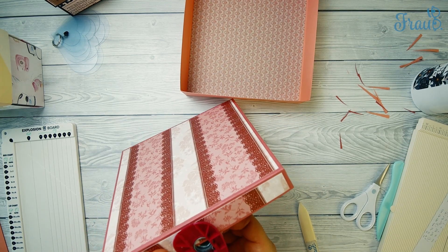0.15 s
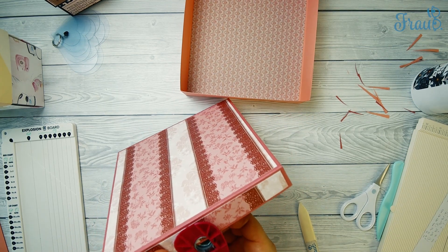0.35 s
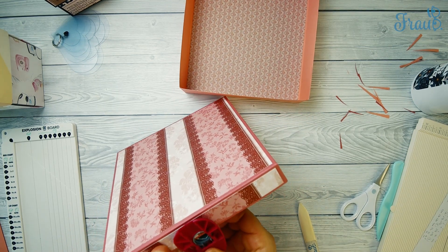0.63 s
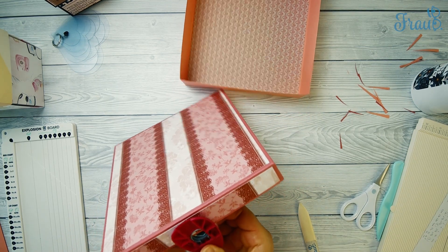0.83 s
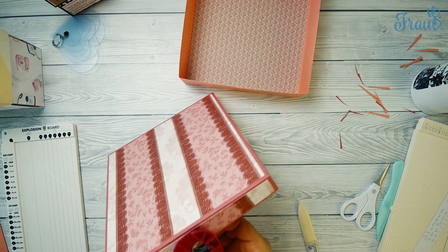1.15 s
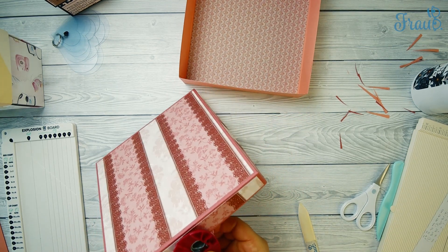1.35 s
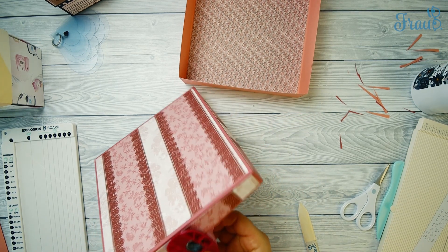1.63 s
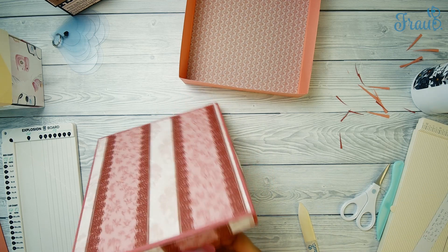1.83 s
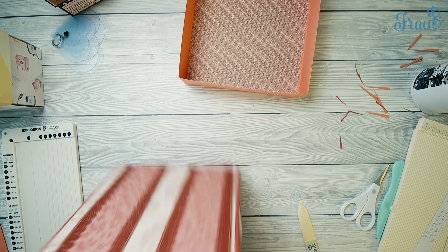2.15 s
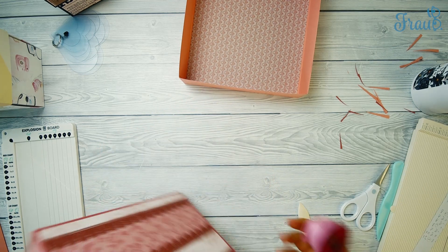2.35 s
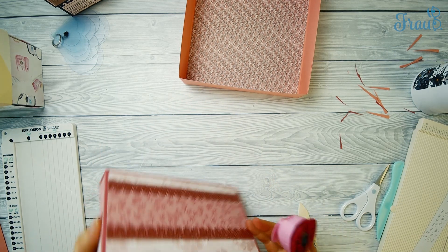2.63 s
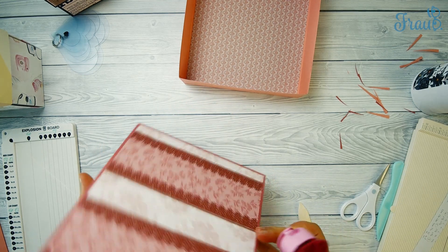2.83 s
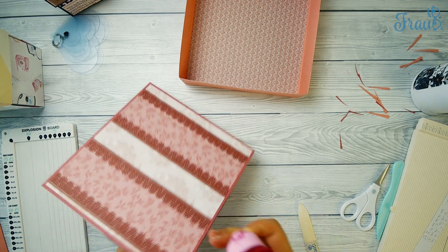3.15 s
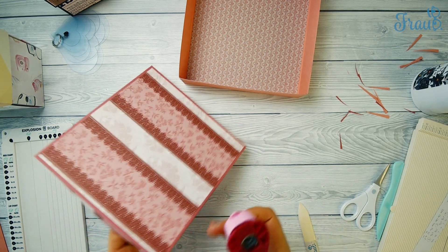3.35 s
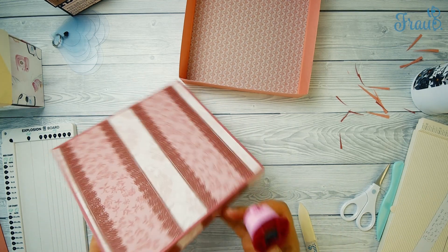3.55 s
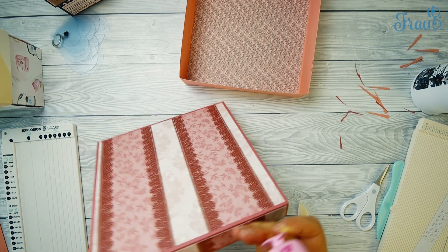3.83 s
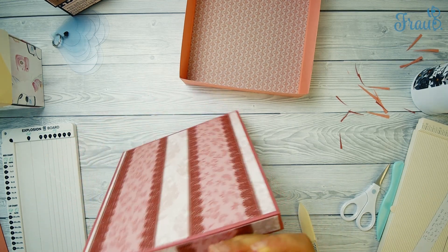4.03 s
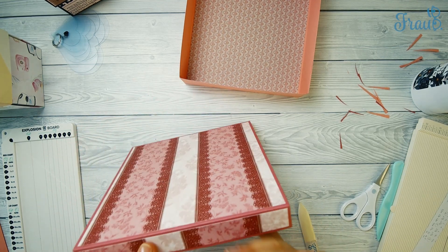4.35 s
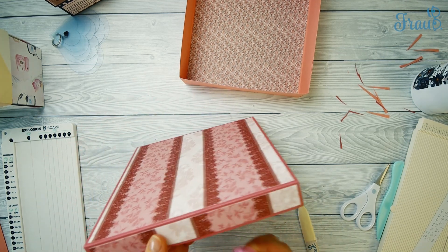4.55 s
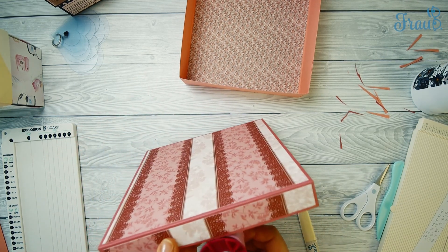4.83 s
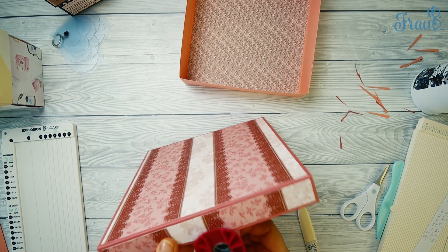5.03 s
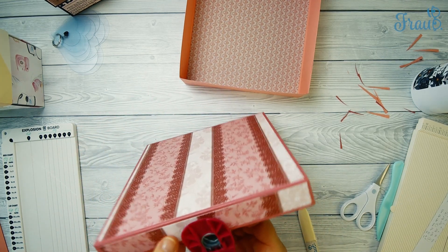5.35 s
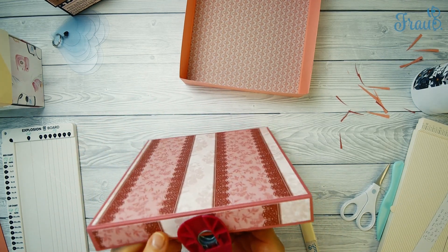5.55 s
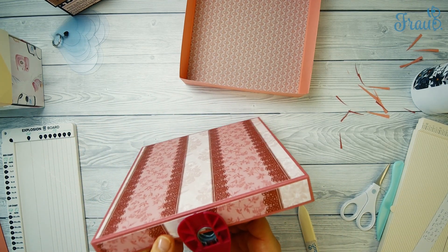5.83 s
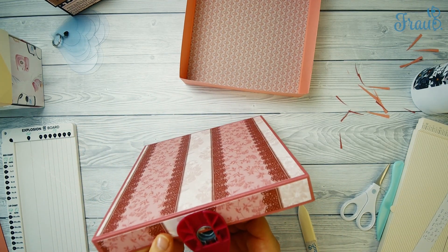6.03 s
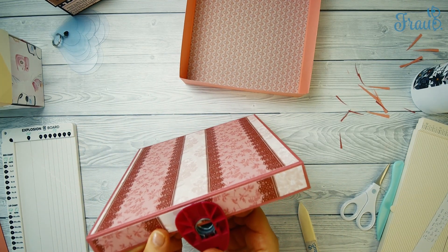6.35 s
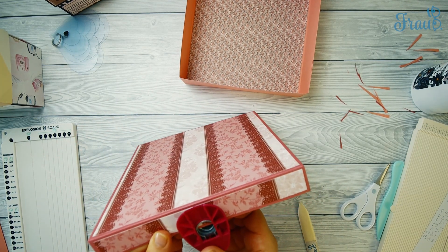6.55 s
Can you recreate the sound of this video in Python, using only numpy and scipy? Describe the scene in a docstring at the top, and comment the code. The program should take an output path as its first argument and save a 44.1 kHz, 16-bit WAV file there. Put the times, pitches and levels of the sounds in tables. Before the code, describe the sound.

Small dry lever ticks and hand rustle, one hard overloaded punch snap through cardstock, then papery sliding and hollow box-lid knocks, fading to a faint squeak.

```python
"""Small dry ticks and the brush of hands come first, in a quiet room: a hand punch is being loaded.
Then it snaps through the cardstock rim of a paper-covered box lid; hands slide, turn and knock the lid.
Noise bursts ring the modes of punch, lid and paper; streams of friction grains make the sliding.
The close microphone overloads on the snap, and its limiter lets the room's tail swell back.
Near the end a spring squeaks faintly, made of thin wavering lines."""
import sys
import numpy as np
from scipy import signal
from scipy.fft import rfft, irfft
from scipy.io import wavfile
from scipy.ndimage import map_coordinates

SR = 44100
rng = np.random.default_rng(int(sys.argv[2]) if len(sys.argv) > 2 else 0)


def gain_from_db(level_db):
    """Convert decibel levels to linear amplitude factors (20 dB per decade)."""
    decades = np.asarray(level_db, float) / 20
    return 10 ** decades


def int16_out(signal):
    """Quantize to a 16-bit WAV file."""
    q = np.round(np.clip(np.atleast_2d(signal).T, -1, 1) * 32767)
    wavfile.write(sys.argv[1], SR, q.astype(np.int16))


N = 294777   # length of the scene in samples

# All levels are those ahead of the microphone's limiter.
# ringing modes of the metal punch: f/Hz, relative level/dB, time to fall 60 dB/s
PUNCH_MODES = [(1500, -9, .01), (1900, -1, .012), (2200, 0, .016), (2450, -3, .012), (2930, -6, .012),
               (3650, -7, .011), (4150, -10, .007), (4600, -9, .007), (5300, -10, .004), (6300, -10, .004),
               (7400, -10, .003), (8600, -11, .003), (10500, -13, .002), (13000, -16, .002)]
# ringing modes of the hollow lid: f/Hz, relative level/dB, time to fall 60 dB/s
LID_MODES = [(166.4, 2.5, 0.038), (224.8, -2, 0.062), (287, -8, .07), (333.6, -2.5, 0.07),
             (400, 0.5, 0.051), (480, -1.5, 0.041), (562.7, 0.5, 0.046), (688, -1.5, 0.024),
             (752, -2, 0.057), (881.5, 1.5, 0.021), (1000, -0.5, 0.03), (1100, 2.5, 0.02), (1200, 3, 0.024),
             (1400, 0.5, 0.016), (1676, -2, 0.03), (1720, -1.5, 0.012), (1931, -3.5, 0.018),
             (2112, -7, 0.015)]
# ringing modes of the paper cover when it cracks: f/Hz, relative level/dB, time to fall 60 dB/s
PAPER_MODES = [(2600, 1.5, 0.0051), (3357, 0, 0.0048), (3800, -1, 0.0067), (5500, -4, 0.0033),
               (8000, -6.5, 0.0018), (12000, -18.5, 0.0026)]
# modes of the rim under sliding fingers: f/Hz, time to fall 60 dB/s
RIM_MODES = [(3050, 0.02), (3400, 0.0072)]
# lever ticks of the punch: t/s, peak level/dB, centre f/Hz
LEVER_TICKS = [(0.3172, -23, 2150), (0.3224, -24, 2320), (0.3541, -25, 1910), (0.3745, -27, 2050),
               (0.4015, -22, 2320), (0.5432, -28, 1910), (0.5591, -27, 1860), (0.5985, -26, 2240),
               (0.624, -25, 1890), (0.6409, -26, 1910), (0.6564, -27, 2220), (0.6744, -26, 1900),
               (0.6933, -25, 1920), (0.7063, -25, 1920), (1.0859, -33, 2150), (1.7878, -19, 2060),
               (2.3276, -36, 2170), (6.565, -41, 2360), (6.6184, -36, 1720), (6.6283, -19, 3520)]
# knocks on the lid: t/s, peak level/dB, centre f/Hz, fading time of the push/ms, paper crack peak level/dB
LID_KNOCKS = [(1.148, -27.5, 540, 7, -32.5), (1.554, -36, 453, 2.1, -32), (1.798, -33, 504, 2.5, -34),
              (1.892, -16, 584, 3.6, -31), (2.536, -33.5, 454, 2, -50.5), (2.646, -36, 400, 3.5, -54),
              (2.792, -37, 396, 2.33, -55), (2.851, -30, 1210, 8.1, -40), (2.87, -25, 854, 2.4, -33),
              (3.017, -24, 1160, 1.9, -40), (3.059, -14, 379, 2.1, -32), (3.221, -7, 420, 3, -24.5),
              (3.241, -18, 340, 1.7, -37), (3.351, -17.5, 596, 1.8, -26), (3.459, -19, 830, 1.4, -31),
              (3.507, -26, 895, 2.6, -45), (3.623, -25, 835, 2.4, -52), (3.64, -25.5, 885, 3.9, -37.5),
              (3.677, -30, 318, 1.7, -41), (3.706, -27, 380, 2.6, -53), (3.798, -26.5, 393, 4.5, -42),
              (4.082, -25.5, 450, 2, -35), (4.094, -21.5, 496, 2.4, -33), (4.249, -13, 1100, 1.56, -24),
              (4.261, -20, 1170, 4.8, -32.5), (4.474, -32, 344, 3.7, -33), (4.961, -33.5, 470, 1.7, -54),
              (5.152, -27.5, 358, 3, -40.5), (5.255, -29.5, 1170, 3, -40.5), (5.301, -29.5, 401, 4.2, -41),
              (5.429, -43, 1300, 1.8, -51), (5.619, -33.5, 1260, 2.5, -53), (5.72, -38.5, 1500, 1.7, -48),
              (5.779, -42, 1400, 2.0, -56), (5.843, -33, 500, 5.3, -49.5), (5.898, -37.5, 447, 2.35, -52.5),
              (6.439, -45.5, 370.6, 4, -61)]
# dry crackles of the paper cover: t/s, peak level/dB
PAPER_CRACKLES = [(1.9696, -32), (2.1429, -28.5), (2.633, -43), (2.6723, -41), (2.836, -44.5),
                  (3.1363, -34), (3.1731, -34.5), (3.3084, -43), (3.7664, -44.5), (4.0632, -47.5),
                  (4.3884, -40), (4.567, -44), (4.8194, -37), (5.5296, -50)]
# strokes of the hands: start t/s, length/s, then level/dB of hollow boom, panel rasp and paper hiss
HAND_STROKES = [(0.328, .15, -49.5, -47, -61), (0.561, 0.17, -49, -49.5, -52),
                (0.843, .1, -30.5, -38, -42.5), (1.028, .06, -34.5, -41, -49.5),
                (1.12, .05, -31, -42.5, -42), (1.31, .03, -39, -43, -48), (1.546, .07, -37, -43.5, -44.5),
                (1.659, .09, -46, -42, -50.5), (1.798, 0.076, -33, -35.5, -40),
                (1.974, 0.04, -29, -34.5, -38.5), (2.063, .05, -36.5, -42.5, -47),
                (2.161, .05, -38.5, -30, -36), (2.637, 0.067, -47, -46.5, -54), (2.794, .02, -52, -50, -60),
                (2.868, .11, -41.5, -37.5, -48), (3.014, 0.06, -29, -28.5, -45),
                (3.135, 0.017, -40, -36, -51), (3.233, 0.032, -44, -28.5, -45.5),
                (3.314, 0.072, -33, -32, -40), (3.453, 0.092, -38.5, -40.5, -47.5),
                (3.619, .12, -39.5, -42.5, -56.5), (3.769, 0.028, -36, -38.5, -49.5),
                (3.851, 0.076, -40, -42, -53.5), (4.053, 0.056, -40.5, -46.5, -54),
                (4.261, .06, -35, -47, -48.5), (4.382, 0.08, -34, -40, -47),
                (4.588, 0.042, -41, -48, -53.5), (4.687, 0.19, -46, -49, -55.5),
                (4.961, 0.112, -48.5, -49, -56.5), (5.139, 0.036, -45, -41, -54.5),
                (5.281, 0.17, -50, -47, -56), (5.532, .04, -45, -44, -55),
                (5.6, 0.042, -48.5, -41.5, -54.5), (5.7, 0.017, -52.5, -41.5, -61),
                (5.781, 0.018, -53.5, -51, -64), (5.869, .08, -54.5, -53, -63),
                (6.116, 0.056, -55, -62.5, -81), (6.3, 0.061, -54, -54.5, -68)]
# level of fingers that never quite rest: boom/dB, rasp/dB, hiss/dB
FIDGET_LEVELS = [-60.5, -63, -70.5]
# where the hands hold the lid, as the modes they favour: t/s, boom centre f/Hz, rasp centre f/Hz
HAND_GRIP = [(0.0, 300, 1570), (0.5, 464, 1710), (0.9, 530, 1370), (1.2, 530, 1200), (1.5, 480, 1800),
             (1.95, 495, 1040), (2.25, 502.3, 1200), (2.55, 367.1, 1220), (3.1, 414, 1070),
             (3.36, 520, 1070), (3.65, 350, 1000), (4.4, 480, 1136), (5.4, 420, 1300), (5.85, 496.5, 1235),
             (6.1, 333, 1150), (6.68, 359.6, 1300)]
# how much the rim sings under the fingers: t/s, level over the paper hiss/dB
RIM_SINGING = [(0.0, -24), (0.9, -11), (2.2, -11.5), (2.8, -12), (3.9, -16.5), (4.3, -8.5), (4.43, -2),
               (4.9, -10), (5.2, -12.5), (5.7, -10), (6.68, -15.5)]
# colour of the paper hiss: f/Hz, relative level/dB per Hz
PAPER_COLOUR = [(1470, -31), (2500, -8), (2640, -12), (2870, -14), (3330, -4), (3910, -6.5), (5250, -14),
                (5670, -14.5), (6770, -18), (9020, -22.5), (14300, -32.5), (15800, -31)]
# thin lines of the spring's squeak: f/Hz, level/dB
SQUEAK_LINES = [(1850, -62), (2380, -52), (4300, -58), (5950, -67)]
# colour of the snap sent round the room: f/Hz, relative level/dB per Hz
SNAP_ECHO_COLOUR = [(180, -52.5), (300, -23.5), (331, -12), (665, -12.5), (799, -20), (991, -8.5),
                    (1090, -17), (2130, -3.5), (2640, -12.5), (2870, -9), (3500, -14), (4130, -6.5),
                    (5390, -23.5), (11000, -22.5), (15800, -32)]
# how long the room's echoes last: f/Hz, time to fall 60 dB/s
ROOM_DECAY = [(250, 0.38), (1000, 0.44), (2500, 0.5), (6000, 0.42), (12000, .33)]
# low thumps through the table: t/s, level/dB
TABLE_THUMPS = [(1.15, -43), (1.34, -42), (1.8, -42), (1.9, -40), (2.16, -47), (2.659, -40), (2.92, -50),
                (3.07, -40.5), (3.24, -37.5), (3.48, -43.5), (3.86, -42.5), (4.26, -42.5), (5.17, -55),
                (5.529, -49.5)]
# low rumble under the thumps: t/s, level/dB
RUMBLE_LEVELS = [(0.0, -50.5), (0.11, -49), (0.8, -46), (1.2, -48), (1.7, -52), (3.7, -53.5), (4.4, -55.5),
                 (6.68, -54)]
# colour of the room tone: f/Hz, relative level/dB per Hz
ROOM_TONE_COLOUR = [(18, -48.5), (30, -23.5), (41, -14), (66, -16.5), (141, -26.5), (251, -16.5), (318, -7),
                    (424, -22.5), (1890, -31.5), (2100, -23), (2460, -49.5), (4050, -37), (13500, -36.5),
                    (15800, -43.5)]
# colour of what differs between the channels: f/Hz, relative level/dB per Hz
SIDE_COLOUR = [(18, -25.5), (30, 2), (318, -12.5), (717, -14.5), (1060, -19), (3200, -19), (5700, -16.5),
               (15800, -17)]

SNAP_START_S, SNAP_RISE_MS, SNAP_FALL_MS = 1.3385, 5.1, 0.83


def snap():
    """The blade tears through: noise swells for a few ms, then collapses, ringing punch and rim."""
    peak_db = 10.5
    ms = 1000 * (np.arange(N) / SR - SNAP_START_S)
    rise = np.clip(ms / SNAP_RISE_MS, 0, 1) ** 2
    fall = np.exp(-np.clip(ms - SNAP_RISE_MS, 0, 50) / SNAP_FALL_MS)
    force = rise * fall * (ms < 40) * rng.standard_normal(N)
    punch_gains = favour(PUNCH_MODES, np.array([2600]), db_per_octave=1.5)[0]
    punch = rms_one(high_pass(modes_of(force, PUNCH_MODES, punch_gains), 890))
    rim_gains = favour(LID_MODES, np.array([1500]), db_per_octave=12.0)[0]
    rim = rms_one(modes_of(force, LID_MODES, rim_gains))
    sound = punch + gain_from_db(-4) * rim
    return gain_from_db(peak_db) * sound / np.abs(sound).max()


def ticks():
    """The lever slips in tiny jerks, each a very short push that rings the punch."""
    s, peak_db, centre_hz = np.transpose(LEVER_TICKS)
    push_ms = 0 * s + 0.6
    strengths = favour(PUNCH_MODES, centre_hz, db_per_octave=0.8)
    return strike(zip(s, peak_db, push_ms), strengths, PUNCH_MODES)


def knocks():
    """A knock rings the lid and cracks the paper under it."""
    s, peak_db, centre_hz, push_ms, crack_db = np.transpose(LID_KNOCKS)
    crack_gains = favour(PAPER_MODES, 0 * s + 3500, db_per_octave=3.5)
    cracks = strike(zip(s, crack_db, push_ms), crack_gains, PAPER_MODES)
    lid_gains = favour(LID_MODES, centre_hz, db_per_octave=5.5)
    return strike(zip(s, peak_db, push_ms), lid_gains, LID_MODES) + cracks


def sliding():
    """One stream of friction grains drives the low modes and the panel modes; the paper hisses on top."""
    split_hz = 740   # boom modes below, rasp modes above
    start_s, length_s, *levels = np.transpose(HAND_STROKES)
    boom_hz, rasp_hz = in_time(HAND_GRIP)
    gains = []
    for level_db, rest_db in zip(levels, FIDGET_LEVELS):
        stroke = swells(start_s, length_s, level_db, rise_db_s=650, fall_db_s=250)
        gains.append(np.hypot(gain_from_db(rest_db), stroke))
    boom_gain, rasp_gain, hiss_gain = gains

    stick_slip = gain_from_db(2.0 * drift(28))   # the skin sticks and slips
    friction = grains(600, spread_db=4.0, smooth=0.65) * stick_slip
    low_modes = [m for m in LID_MODES if m[0] < split_hz]
    panel_modes = [m for m in LID_MODES if m[0] > split_hz]
    boom = rubbed(friction, low_modes, boom_hz, db_per_octave=10.5, patchy_db=3.5)
    rasp = rubbed(friction, panel_modes, rasp_hz, db_per_octave=5.0, patchy_db=2.5)
    hiss = paper_hiss()
    return boom_gain * high_pass(boom, 210) + rasp_gain * high_pass(rasp, 650) + hiss_gain * hiss


def paper_hiss():
    """Dense fibre clicks make a flickering hiss and set the narrow rim singing now and then."""
    fibres = grains(3000, spread_db=3.5, smooth=0.7)
    flicker_db = 1.5 * drift(20)
    singing_db = in_time(RIM_SINGING)[0] + 1.5 * drift(8)
    rim = sum(rms_one(ring(fibres, hz, t60)) for hz, t60 in RIM_MODES)
    return (coloured(fibres, PAPER_COLOUR) + gain_from_db(singing_db) * rim) * gain_from_db(flicker_db)


def crackles():
    """Creases let go with a short ring of the paper, without moving the lid."""
    s, peak_db = np.transpose(PAPER_CRACKLES)
    push_ms = 0 * s + 3.2
    strengths = favour(PAPER_MODES, 0 * s + 4500, db_per_octave=-1.0)   # favours modes away from the centre
    return strike(zip(s, peak_db, push_ms), strengths, PAPER_MODES)


def squeak():
    """Near the end a spring squeaks faintly: thin lines start sharply and waver."""
    start_s, length_s, attack_s, fall_db_s = 6.563, 0.055, 0.0026, 150
    t = np.arange(N) / SR - start_s
    gate = (t > 0) * (t < length_s)
    shape = gate * np.clip(t / attack_s, 0, 1) * gain_from_db(-fall_db_s * np.clip(t, 0, 1))
    # noise through a narrow resonance makes a line of wavering strength
    lines = [gain_from_db(db) * rms_one(ring(rng.standard_normal(N), hz, 0.069)) for hz, db in SQUEAK_LINES]
    return shape * sum(lines)


def snap_echo():
    """Heard from all sides the snap is one sharp click of smooth colour; this is what the walls return."""
    click = np.zeros(N)
    click[round((SNAP_START_S + SNAP_RISE_MS / 1000) * SR)] = 1
    unit_energy = coloured(click, SNAP_ECHO_COLOUR) / np.sqrt(N)
    return gain_from_db(19) * room(unit_energy)


def room(x):
    """Dense echoes: octave bands of noise, each dying at its own rate, after a short gap."""
    gap_s = 0.003
    t, echoes = np.arange(SR // 2) / SR, 0
    for low_hz in 125 * 2. ** np.arange(7):
        band = signal.butter(2, [low_hz, 2 * low_hz], "band", fs=SR, output="sos")
        t60 = at_hz(ROOM_DECAY, np.sqrt(2) * low_hz)
        echoes = echoes + signal.sosfilt(band, rng.standard_normal(len(t))) * gain_from_db(-60 * t / t60)
    unit_energy = echoes / np.sqrt(np.sum(echoes ** 2))
    response = np.append(np.zeros(round(gap_s * SR)), unit_energy)
    return signal.fftconvolve(x, response)[:N]


def rumble():
    """Low noise through the table swells with each thump."""
    s, db = np.transpose(TABLE_THUMPS)
    band = signal.butter(3, [40, 170], "band", fs=SR, output="sos")
    low_noise = rms_one(signal.sosfilt(band, rng.standard_normal(N)))
    steady = gain_from_db(in_time(RUMBLE_LEVELS)[0])
    thumps = swells(s, 0 * s, db, rise_db_s=250, fall_db_s=150)
    return np.hypot(steady, thumps) * low_noise


def room_tone():
    """The quiet room is steady coloured noise, the same in both channels."""
    return gain_from_db(-59) * coloured(rng.standard_normal(N), ROOM_TONE_COLOUR)


def side_hiss():
    """Faint coloured noise, to be added to one channel and taken from the other."""
    return gain_from_db(-71) * coloured(rng.standard_normal(N), SIDE_COLOUR)


def strike(events, strength_db, modes):
    """Each event is a sudden push and a rattle that drive every mode; it is scaled to its listed peak."""
    out, t = np.zeros(N + 8192), np.arange(8192) / SR
    for (s, peak_db, push_ms), row in zip(events, strength_db):
        pace = 1000 * t / push_ms
        force = np.clip(8 * pace, 0, 1) * np.exp(-pace) * rng.standard_normal(len(t))
        hit = high_pass(modes_of(force, modes, row), 0.75 * modes[0][0])
        at = round(s * SR)
        out[at:at + len(t)] += gain_from_db(peak_db) * hit / np.abs(hit).max()
    return out[:N]


def favour(modes, centre_hz, db_per_octave):
    """Each blow favours modes by their distance from its centre, with some chance; gives dB."""
    octaves = np.log2(np.array(modes)[:, 0] / centre_hz[:, None])
    chance_db = rng.normal(0, 2, octaves.shape)
    return chance_db - db_per_octave * np.abs(octaves)


def modes_of(force, modes, strength_db=0):
    """Sum of all modes; neighbours swing in opposite directions."""
    gains = gain_from_db(np.array(modes)[:, 1] + strength_db) * (-1) ** np.arange(len(modes))
    return sum(g * ring(force, hz, t60) for g, (hz, db, t60) in zip(gains, modes))


def ring(force, hz, t60):
    """A two-pole resonance: a unit click starts a sine of height 1 that falls 60 dB in t60 seconds."""
    r, w = gain_from_db(-60 / (t60 * SR)), 2 * np.pi * hz / SR
    return signal.lfilter([0, np.sin(w)], [1, -2 * r * np.cos(w), r * r], force + 1e-18)


def rubbed(friction, modes, centre_hz, db_per_octave, patchy_db):
    """As the hand moves it favours other modes; the total strength stays even."""
    gains, rings = [], []
    for k, (hz, db, t60) in enumerate(modes):
        distance = np.abs(np.log2(hz / centre_hz))   # octaves
        gains.append(gain_from_db(db - db_per_octave * distance + patchy_db * drift(9)))
        rings.append((-1) ** k * rms_one(ring(friction, hz, t60)))
    total = np.sqrt(np.sum(np.square(gains), axis=0))
    return np.sum(np.multiply(gains, rings), axis=0) / total


def grains(per_s, spread_db, smooth):
    """Fibres catching: sparse clicks of uneven size over a smooth share of noise; rms 1."""
    sizes = gain_from_db(spread_db * np.minimum(rng.exponential(1, N), 4)) * rng.choice([-1, 1], N)
    clicks = rms_one(sizes * (rng.random(N) < per_s / SR))
    return rms_one(clicks + smooth * rng.standard_normal(N))


def swells(start_s, length_s, level_db, rise_db_s, fall_db_s):
    """Gain of events that rise, hold and fall; their powers add."""
    t, power = np.arange(0, N + 32, 32) / SR, 0   # worked out at every 32nd sample
    for s, hold, db in zip(start_s, length_s, level_db):
        loss_db = rise_db_s * np.maximum(s - t, 0) + fall_db_s * np.maximum(t - s - hold, 0)
        power = power + gain_from_db(db - loss_db) ** 2
    return np.interp(np.arange(N) / SR, t, np.sqrt(power))


def drift(per_s):
    """Slow chance: random points of spread 1, up to 40 per second, joined smoothly."""
    points = rng.standard_normal(int(N / SR * 40) + 2)
    return map_coordinates(points, [np.arange(N) / SR * per_s], order=3)


def coloured(x, spectrum):
    """Give a flat-spectrum sound a colour; rms 1."""
    hz = np.maximum(np.arange(len(x) // 2 + 1) * SR / len(x), 1)
    return rms_one(irfft(rfft(x) * gain_from_db(at_hz(spectrum, hz)), len(x)))


def high_pass(x, hz):
    """Small things radiate little bass."""
    return signal.sosfilt(signal.butter(3, hz, "high", fs=SR, output="sos"), x)


def rms_one(x):
    """Scale to rms 1."""
    return x / np.sqrt(np.mean(x ** 2) + 1e-20)


def in_time(rows):
    """Columns of a curve at every sample."""
    s, *columns = np.transpose(rows)
    return [np.interp(np.arange(N) / SR, s, c) for c in columns]


def at_hz(points, hz):
    """Read a table on a log-frequency axis."""
    table_hz, values = np.transpose(points)
    return np.interp(np.log(hz), np.log(table_hz), values)


def scene():
    """Punch and lid close to the microphone, their echoes, rumble and room tone, in two channels."""
    hits = ticks() + knocks() + crackles()
    rubs = sliding()
    echoes = gain_from_db(-9) * room(hits + 0.5 * rubs) + snap_echo()
    mid = snap() + hits + rubs + squeak() + echoes + rumble() + room_tone()
    side = side_hiss()
    return np.array([mid + side, mid - side])


def roll_off(x):
    """The treble ends steeply here."""
    return signal.sosfilt(signal.butter(12, 16000, fs=SR, output="sos"), x)


def record(dry):
    """The limiter is too slow for the snap, which clips; then it holds the gain down and lets go slowly."""
    limit_db, attack_s, release_db_s = -5.5, 0.006, 122
    peak_db = 20 * np.log10(np.abs(dry).max(axis=0) + 1e-9)
    over_db = np.maximum(peak_db - limit_db, 0)
    ramp = release_db_s * np.arange(N) / SR
    held_db = np.maximum.accumulate(over_db + ramp) - ramp   # falls back in a straight line in dB
    r = np.exp(-1 / (attack_s * SR))
    cut_db = signal.lfilter([1 - r], [1, -r], held_db)
    clipped = np.clip(dry * gain_from_db(-cut_db), -1, 1)
    return roll_off(clipped)


dry = scene()
out = record(dry)
int16_out(out)
```